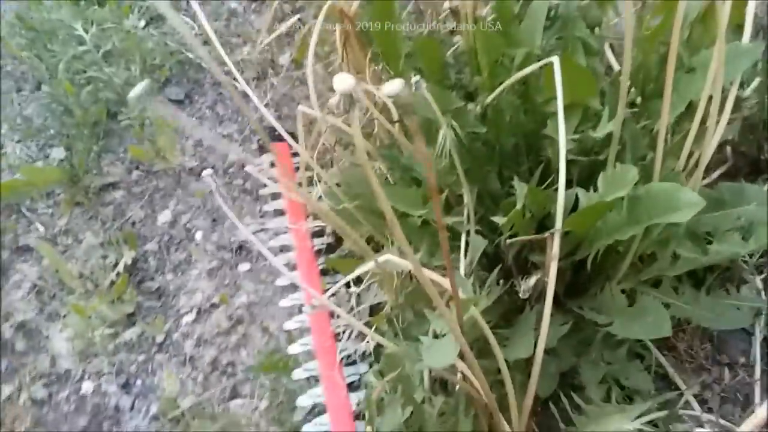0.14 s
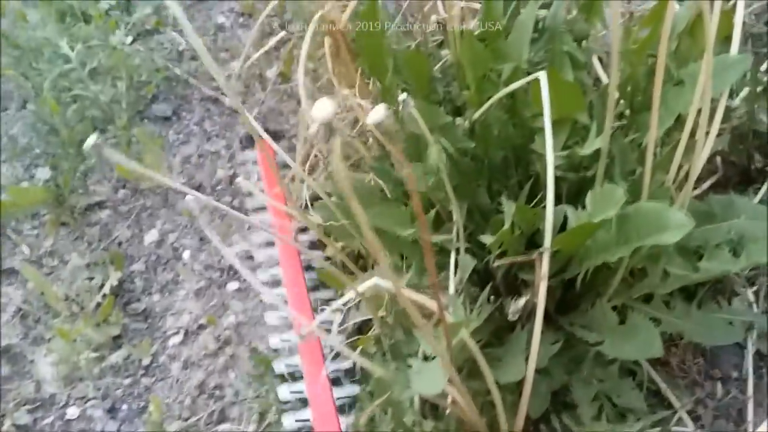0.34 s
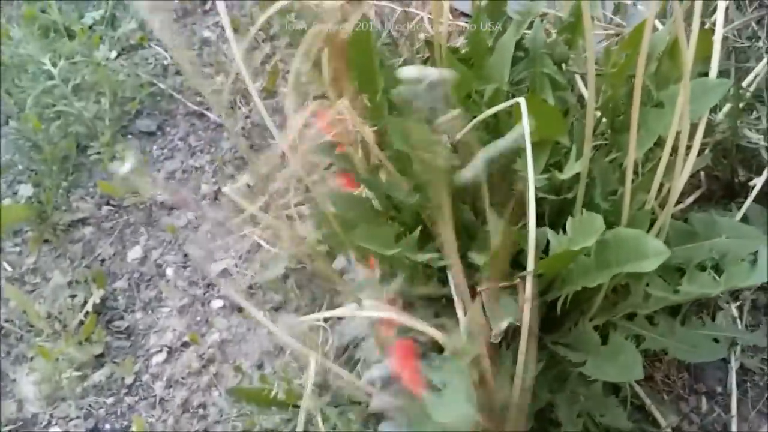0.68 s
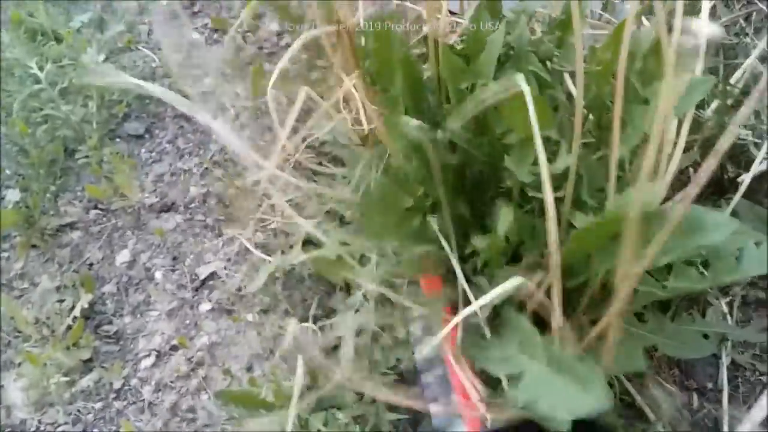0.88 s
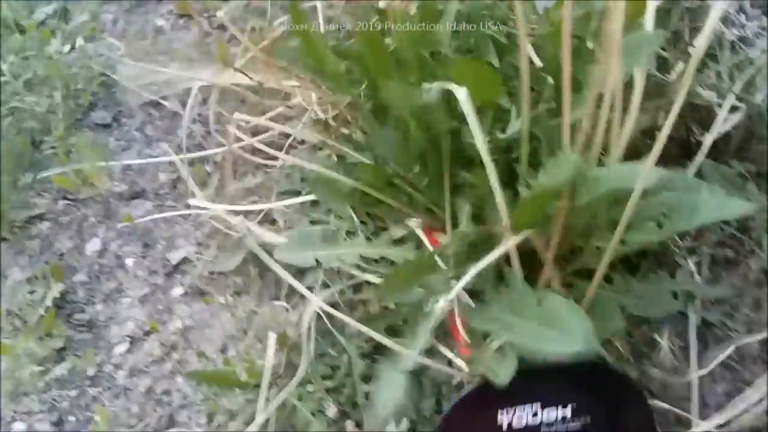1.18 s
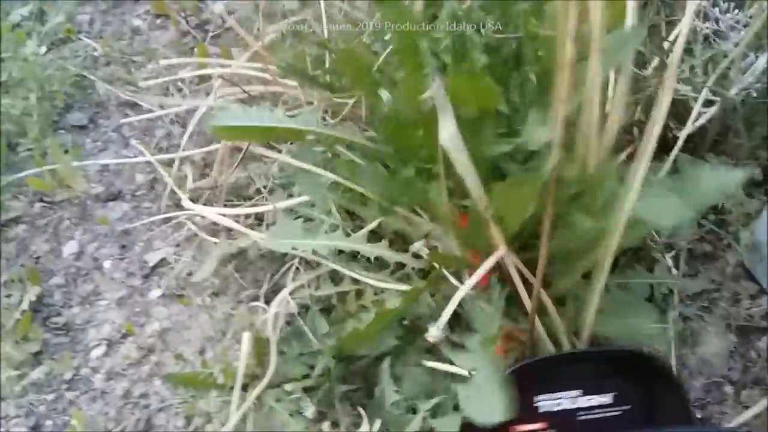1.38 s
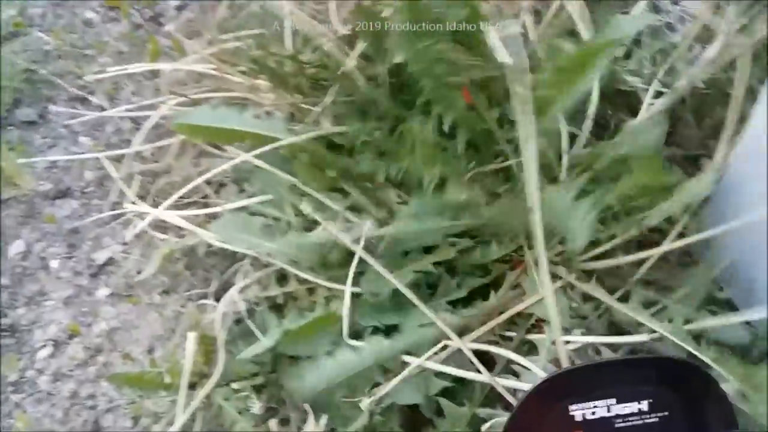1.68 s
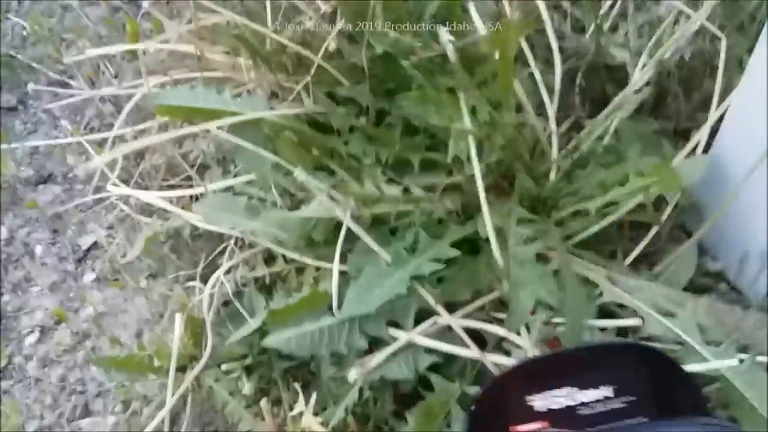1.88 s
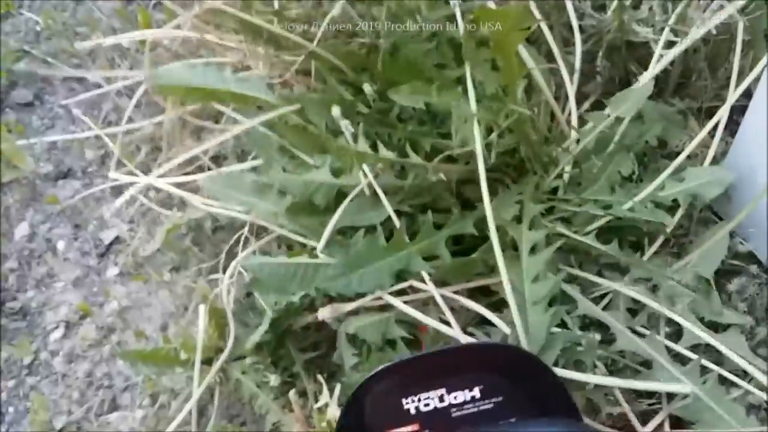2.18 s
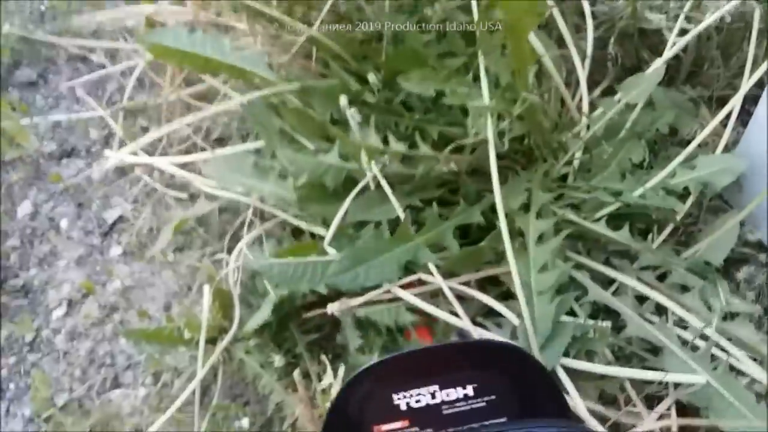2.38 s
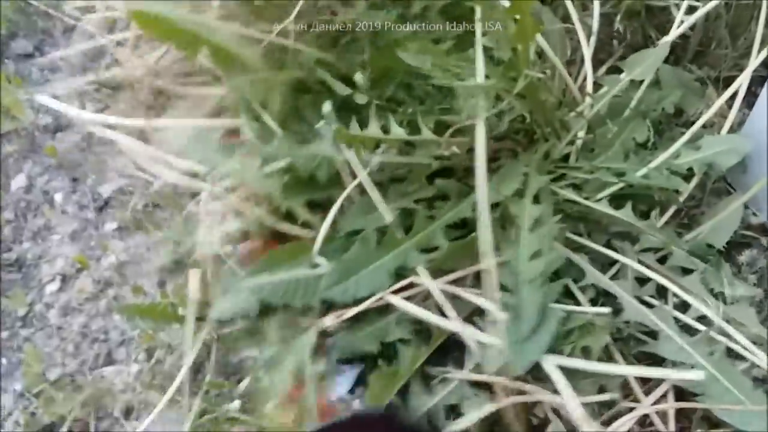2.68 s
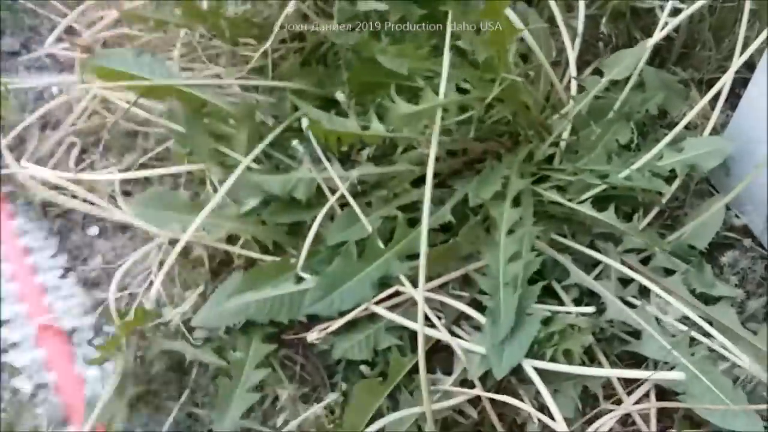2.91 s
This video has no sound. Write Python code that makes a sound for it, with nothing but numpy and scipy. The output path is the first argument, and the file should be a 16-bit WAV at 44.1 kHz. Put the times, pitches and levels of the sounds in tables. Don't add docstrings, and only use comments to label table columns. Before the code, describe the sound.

A small cordless hedge trimmer clicks on and rattles steadily, its blades chattering through weed stems

```python
import sys
import numpy as np
from scipy import signal
from scipy.fft import rfft, irfft, next_fast_len
from scipy.io import wavfile
from scipy.ndimage import uniform_filter1d, map_coordinates

SR = 44100
rng = np.random.default_rng(int(sys.argv[2]) if len(sys.argv) > 2 else 0)


def store_wav(level_fs):
    pcm = np.round(np.clip(np.atleast_2d(level_fs), -1, 1) * 32767)
    wavfile.write(sys.argv[1], SR, pcm.T.astype(np.int16))


def volts_from_db(level):
    exponent = np.asarray(level, float) / 20
    return 10 ** exponent


N = 134505
T = np.arange(N) / SR
START_S = 0.3913


def unit(x):
    return x / np.sqrt(np.mean(x ** 2) + 1e-20)


def along(points, hz):
    f, v = np.transpose(points)
    return np.interp(np.log(hz + 1), np.log(f + 1), v)


def curves(rows):
    s, *cols = np.transpose(rows)
    return [np.interp(T, s, c) for c in cols]


def wobble(rate):
    knots = rng.standard_normal(int(N * rate / SR) + 4)
    return map_coordinates(knots, [np.arange(N) * rate / SR])


def noise():
    return rng.standard_normal((2, N))


def split(db):
    return volts_from_db([[db], [-db]])


def until(end_s, fade_s):
    return np.clip((end_s - T) / fade_s, 0, 1)


def filtered(x, response):
    m = next_fast_len(N + SR // 2)
    return irfft(rfft(x, m) * response(np.fft.rfftfreq(m, 1 / SR)), m)[..., :N]


def resonant(x, rows):
    def response(f):
        return 1 + sum(volts_from_db(db) * 1j * f * w / (c * c - f * f + 1j * f * w) for c, w, db in rows)
    return filtered(x, response)


def stereo(pair, spectrum, alike, lean=((1, 0),)):
    def colour(hz):
        turn = np.arccos(np.clip(along(alike, hz), -1, 1)) / 2
        return volts_from_db(along(spectrum, hz)) * [np.cos(turn), np.sin(turn)]
    mid, side = filtered(pair, colour)
    ports = np.array([mid + side, mid - side])
    return filtered(ports, lambda hz: volts_from_db(np.outer([.5, -.5], along(lean, hz))))


def patchy(patchy_db):
    z = signal.stft(noise(), nperseg=512)[2]
    field = uniform_filter1d(rng.standard_normal(z.shape[1:]), size=3, axis=0)
    field = uniform_filter1d(field, size=24, axis=1)
    return signal.istft(z * volts_from_db(patchy_db * unit(field)), nperseg=512)[1][:, :N]


def bursts(times, dbs, t60, rise):
    at = (np.asarray(times) * SR).astype(int)
    spikes = np.bincount(at, volts_from_db(np.asarray(dbs)), N)[:N]
    t = np.arange(SR // 8) / SR
    return signal.fftconvolve(spikes, volts_from_db(-60 * t / t60) * (1 - np.exp(-t / rise)))[:N]


# [t/s, level/dB]
ENGINE_LEVEL = [(0, -55), (.06, -52), (.2, -70), (.35, -60.5), (.6, -64), (.92, -52.5), (1.3, -53),
                (1.75, -46), (2.27, -48), (2.7, -54), (3.05, -56)]
DRONE_HZ = 68.6


def far_engine():
    level = volts_from_db(curves(ENGINE_LEVEL)[0] + 8.5 + 2.0 * wobble(12.23))
    phase = 2 * np.pi * DRONE_HZ * T + .3 * wobble(4.1) + np.array([[.1], [-.1]])
    return level * np.sin(phase) * split(1.1)


# [f/Hz, level/dB per Hz]
AIR_SPECTRUM = [(15, -41), (25, -16.5), (156, -11.5), (209, -11.5), (433, -18.5), (970, -13), (1750, -19.5),
                (4040, -28.5), (15500, -47)]
# [f/Hz, level/dB per Hz]
RUMBLE_SPECTRUM = [(20, -30), (50, -28), (85, -1), (130, -25), (200, -43), (400, -43)]
# [f/Hz, likeness/1]
AIR_ALIKE = [(100, 0.89), (600, .3), (5000, 0.31)]
AIR_DB, RUMBLE_DB, HISS_DB = -57, -67, -76
RUSTLE_S, RUSTLE_DB, GRIP_S, GRIP_DB = .21, 3.5, .15, 13


def outdoor_floor():
    rustle_db = RUSTLE_DB * until(RUSTLE_S, 0.014)
    air_level = volts_from_db(AIR_DB + rustle_db + 1.3 * wobble(27.6))
    air = air_level * unit(stereo(patchy(patchy_db=-3.2), AIR_SPECTRUM, AIR_ALIKE))
    rumble_level = volts_from_db(RUMBLE_DB + GRIP_DB * until(GRIP_S, 0.012) + 0.83 * wobble(10))
    rumble = rumble_level * unit(stereo(noise(), RUMBLE_SPECTRUM, AIR_ALIKE))
    return air + rumble + volts_from_db(HISS_DB + rustle_db) * noise()


# [f/Hz, likeness/1]
ALIKE = [(60, 0), (180, 0.72), (450, 0.87), (900, 0.95), (1500, 0.21), (2800, 0.27), (5000, 0.073),
         (9000, 0)]
# [f/Hz, level/dB]
LEAN = [(60, -3), (180, 0.5), (550, 3), (1650, 6), (4970, 7.5), (15000, -2.5)]


def close_by(pair, spectrum):
    return stereo(pair, spectrum, ALIKE, LEAN)


# [t/s, peak level/dB, treble level/dB, tail length factor/1]
CLICKS = [(0.0467, -38.5, -6, 0.44), (0.0487, -24, -8, 1.1), (.0873, -10.5, 0.5, 1.15),
          (0.1, -12, 2.5, 1.37), (.175, -34, 5.5, 0.32), (0.184, -45, 7, 0.74), (.23, -62, 13, .6),
          (0.308, -48.5, -5, 5), (0.315, -51, -4, 7.6), (.363, -48, -12, 0.95), (0.3955, -25, 9.5, 1.2)]
# [f/Hz, level/dB per Hz]
CRACK = [(60, -8), (300, -14.5), (800, -11), (1500, -12), (2400, -5), (3600, -11.5), (4800, -24),
         (6000, -67)]
# [f/Hz, level/dB per Hz]
TICK = [(2500, -46), (3800, -12), (4800, -14.5), (6000, -19), (10000, -24), (15500, -24)]
# [f/Hz, width/Hz, level/dB]
GRIP_RINGS = [(937, 37, 7), (1490, 150, 7.5), (2270, 300, 4), (3300, 610, 0.5), (4400, 400, 4),
              (7030, 460, 6.5)]


def switch():
    env, t = np.zeros((2, N)), np.arange(SR // 4) / SR
    for s, db, treble_db, slow in CLICKS:
        impact = volts_from_db(5.5 - 60 * t / 0.0022)
        body = volts_from_db(-60 * t / (0.018 * slow))
        tail = volts_from_db(-24.5 - 60 * t / (0.13 * slow))
        shape = (impact + body + tail) * (1 - np.exp(-t / 0.000079))
        env[:, round(s * SR):][:, :len(t)] += volts_from_db(db + np.array([[0], [treble_db]])) * shape
    crack = stereo(env[0] * noise(), CRACK, ALIKE)
    tick = stereo(env[1] * noise(), TICK, ALIKE)
    return resonant(crack + tick, GRIP_RINGS) * volts_from_db([[8], [1.5]])


# [t/s, pose/1]
POSE = [
    (.95, 0),
    (1.15, 1),
    (1.45, 1),
    (1.6, 2),
    (1.86, 2),
    (2.05, 3),
    (2.72, 3),
    (2.84, 4),
]
# [f/Hz, width/Hz, free level/dB, swung in level/dB, near level/dB, pressed down level/dB]
HOUSING = [(672, 53, 4.5, 1.5, -5, 5), (820, 22.6, 4, -5, 6, 12.5), (887, 65, 0, 3, -3, 11),
           (971, 130, 4.5, 3.5, 9, 5), (1285, 104, 1.5, -2, -5, 5.5), (1570, 460, -19, -16, -33, -1.5),
           (2375, 430, 1.5, 4, -4, 9), (2676, 113, 2.5, 10.5, 8.5, -20), (3403, 86, 4.5, 5, 8.5, 5.5),
           (4000, 370, -1.5, -3, 1, -11), (4840, 680, -9, -4, -2.5, -7), (7210, 520, 5, -2, 6, 8)]
TREMBLE = .3
SWAY_S = .00007


def housing(x):
    pose = curves(POSE)[0] + TREMBLE * wobble(14)
    out = np.zeros((2, N))
    for k in range(4):
        share = np.clip(1 - abs((pose - k + 2) % 4 - 2), 0, 1)
        out += share * resonant(x, [(r[0], r[1], r[2 + k]) for r in HOUSING])
    place = np.arange(N) + SWAY_S * SR * wobble(1.506)
    return np.array([out[0], map_coordinates(out[1], [place], order=3, mode="nearest")])


# [f/Hz, level/dB per Hz]
SNAP = [(300, -28), (1000, -12), (3000, -8), (5500, -4), (7000, 1), (9000, 2), (12000, 4), (15500, 3)]


def snap(env):
    return resonant(close_by(env * noise(), SNAP), [r[:3] for r in HOUSING])


# [t/s, level/dB]
LOAD = [(.4, -60), (1.05, -50), (1.25, -43), (1.52, -37), (1.65, -47), (2.08, -45), (2.17, -36), (2.5, -31),
        (2.7, -34), (2.78, -50)]
TEETH, PINION, SHAFT_DB = 62.5, 9, -56
WHINE_DRIFT, WHINE_JITTER = 1.3, .2


def gear_whine(turns):
    mesh = 2 * np.pi * TEETH * turns + WHINE_DRIFT * wobble(23.99) + WHINE_JITTER * wobble(150)
    pulse_db = (4.0 + 0.6 * wobble(9)) * np.cos(2 * np.pi * 0.98 * (turns - 0.46))
    level_db = curves(LOAD)[0] + 3 + pulse_db + 1.8 * wobble(50) + .8 * wobble(180)
    whine = volts_from_db(level_db) * np.sin(mesh + np.array([[.15], [-.15]])) * split(2.5)
    swell_db = 6 * np.exp(-((T - .78) / .2) ** 2)
    return whine + volts_from_db(SHAFT_DB + swell_db + 1.5 * wobble(6)) * np.sin(mesh / PINION)


# [t/s, peak level/dB, ringing f/Hz]
KNOCKS = [(0.395, -31, 904), (0.508, -23, 1065), (0.585, -24, 1014), (0.825, -30, 910), (0.898, -23, 893),
          (0.977, -23, 948), (1.05, -33, 920), (1.106, -21, 856), (1.154, -20, 920), (1.23, -20.5, 945),
          (1.282, -19, 925), (1.358, -22, 900), (1.415, -24, 937), (1.446, -20, 932), (1.501, -26, 936),
          (1.601, -17, 808), (1.72, -25, 940), (1.774, -17.5, 970), (1.799, -15.5, 970),
          (1.878, -17.5, 1095), (1.951, -23, 767), (2.007, -24, 827), (2.062, -23, 844), (2.101, -15, 822),
          (2.141, -20, 884), (2.194, -18, 888), (2.299, -18, 910), (2.368, -30, 880), (2.418, -32, 825),
          (2.479, -19, 883), (2.508, -19, 955), (2.544, -17.5, 920), (2.629, -19, 907), (2.666, -20, 912),
          (2.735, -20, 891), (2.767, -20, 864), (2.847, -19, 931), (2.919, -23, 918), (3.003, -21.5, 960),
          (3.026, -19.5, 1013)]
RING_DB, RING_S = -4.5, 0.083


def shell_rings():
    out, t = np.zeros(N + SR), np.arange(SR // 6) / SR
    wander = np.pad(1.03 * wobble(90), (0, SR))
    for s, db, hz in KNOCKS:
        at = round(s * SR)
        env = volts_from_db(db + RING_DB - 60 * t / RING_S) * (1 - np.exp(-t / 0.0038))
        out[at:][:len(t)] += env * np.sin(2 * np.pi * hz * t + wander[at:][:len(t)])
    return out[:N] * split(2)


# [f/Hz, level/dB per Hz]
KNOCK_SPECTRUM = [(300, -12), (600, -8), (900, -2.5), (1300, 1), (3000, -33)]
KNOCK_DB, KNOCK_S = 1.5, 0.041
JOLT_DB, JOLT_S = -29, .1


def crank_knocks():
    jolt = volts_from_db(JOLT_DB) * np.exp(-abs(T - START_S) / JOLT_S)
    times, dbs = np.transpose(KNOCKS)[:2]
    env = bursts(times, dbs, KNOCK_S, rise=0.0013) + jolt
    return volts_from_db(KNOCK_DB) * housing(close_by(env * noise(), KNOCK_SPECTRUM))


# [t/s, peak level/dB]
BITES = [(0.4273, -38), (0.7326, -37), (0.784, -26), (0.809, -32), (0.8354, -35), (0.8613, -33),
         (0.9134, -31), (0.9387, -33), (0.9646, -35), (1.0424, -36), (1.2225, -34), (1.2474, -32),
         (1.2993, -34), (1.3243, -31), (1.351, -28), (1.404, -26), (1.43, -24.5), (1.482, -28),
         (1.5084, -30), (1.5333, -34), (1.5862, -37), (1.6125, -23.5), (1.7917, -32), (1.8685, -31),
         (2.0222, -31), (2.0726, -26), (2.1, -21), (2.1524, -26), (2.2058, -24.5), (2.2593, -22),
         (2.3115, -28), (2.338, -28), (2.3629, -31), (2.3909, -29), (2.4687, -31), (2.4973, -30),
         (2.5485, -38), (2.575, -26), (2.6026, -25), (2.628, -19.5), (2.681, -22), (2.7071, -25),
         (2.7331, -27), (2.759, -21), (2.8356, -25.5), (2.888, -26.5), (2.9524, -27)]
BITE_DB = 4.5


def stem_bites():
    return volts_from_db(BITE_DB) * snap(bursts(*np.transpose(BITES), t60=.016, rise=.001))


# [f/Hz, level/dB per Hz]
SLIDE_SPECTRUM = [(3000, -4), (6000, -5), (9000, -11), (11500, -4.5), (15500, -5.5)]


def blade_slide():
    grain = volts_from_db(1.9 * wobble(590) + 1.9 * wobble(30.54))
    return unit(close_by(grain * patchy(patchy_db=-1.5), SLIDE_SPECTRUM))


# [place/turn, level/dB]
REVERSALS = [
    (.43, 0),
    (.95, -7),
]
CLACK_DB, CLACK_S, CLACK_SCATTER_DB = -9.5, 0.008, 2.5


def reversal_clacks(turns):
    late = slice(SR // 2, None)
    hits = [(np.interp(k + place, turns[late], T[late]), db) for k in range(21, 117) for place, db in REVERSALS]
    times, dbs = np.transpose(hits)
    scatter = CLACK_SCATTER_DB * rng.standard_normal(len(hits))
    return snap(bursts(times, dbs + CLACK_DB + scatter, CLACK_S, rise=0.00023))


# [f/Hz, level/dB per Hz]
RATTLE_SPECTRUM = [(110, -25), (381, -10.5), (680, -7.5), (941, -10), (1500, -8.5), (1800, -9),
                   (2450, -9.5), (3990, -7), (9000, -23.5), (11700, -26), (19800, -120)]
BEAT_DB, KICK_DB, BLOTCH_DB = 2.6, 3, .5
THUD_HZ, RASP_SHARE = 1500, .35


def gear_rattle(turns):
    grit = volts_from_db(1.42 * wobble(400) + 0.47 * wobble(60) + BLOTCH_DB * wobble(15))
    beat_db = BEAT_DB * (0.5 + 0.88 * wobble(5.45)) * np.cos(2 * np.pi * (turns - 0.99))
    kick_db = KICK_DB * (.5 - (2 * (turns - REVERSALS[0][0])) % 1)
    beat = volts_from_db(beat_db + kick_db)
    teeth = grit * patchy(patchy_db=1.8)
    thud = filtered(teeth, lambda hz: 1 / (1 + (hz / THUD_HZ) ** 4))
    rasp = (teeth - thud) * beat ** RASP_SHARE
    chatter = thud * beat * volts_from_db(0.58 * wobble(90)) + rasp
    return unit(housing(close_by(chatter, RATTLE_SPECTRUM)))


# [t/s, angle/turns]
CRANK = [(.39, 15.3), (.6, 23.26), (1.35, 52.34), (1.65, 63.86), (1.95, 75.62), (2.1, 81.41), (2.7, 104.14),
         (3.05, 117.67)]
# [t/s, level/dB, brightness/dB]
NEAR = [(.42, -31, 1), (.7, -26.5, -2), (1.09, -27.5, -2.5), (1.36, -23.5, -1.5), (1.5, -25, 0.5),
        (2.05, -25, 0.5), (2.2, -24.5, 0.5), (2.65, -25, 3.5), (2.9, -25, 2), (3.05, -26.5, -0.5)]
# [t/s, left over right level/dB]
BEARING = [(.4, 0.5), (.9, -0.5), (1.7, 1), (2.05, -1), (3.05, 0.5)]
SPIN_UP_S, SLIDE_DB = 0.019, -12


def trimmer():
    turns = uniform_filter1d(curves(CRANK)[0], size=2001, mode="nearest")
    level_db, bright_db = curves(NEAR)
    rattle = gear_rattle(turns)
    blades = volts_from_db(SLIDE_DB) * blade_slide() + reversal_clacks(turns)
    body = volts_from_db(level_db) * (rattle + volts_from_db(bright_db) * blades)
    running = np.clip(1 - np.exp(-(T - START_S) / SPIN_UP_S) * 0.93, 0, 1) * (T > START_S)
    bearing = volts_from_db(np.outer([.5, -.5], curves(BEARING)[0]))
    return running * bearing * (body + gear_whine(turns) + stem_bites() + crank_knocks() + shell_rings())


def scene():
    return trimmer() + switch() + far_engine() + outdoor_floor()


def top_cut(x):
    return signal.sosfilt(signal.butter(12, 16950, fs=SR, output="sos"), x)


def record(dry):
    mix = filtered(dry, lambda hz: (hz < 15900) / (1 + (40 / (hz + 1)) ** 2))
    return top_cut(mix)


dry = scene()
out = record(dry)
store_wav(out)
```